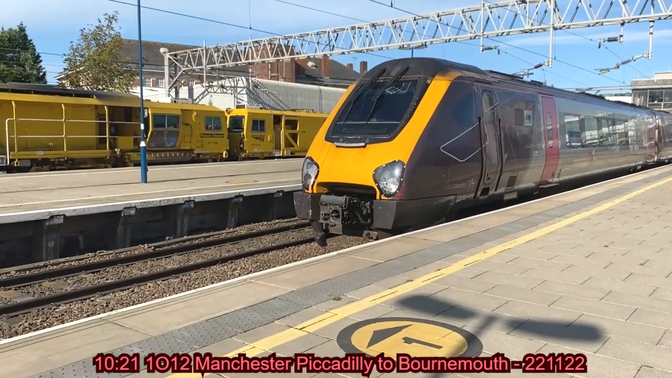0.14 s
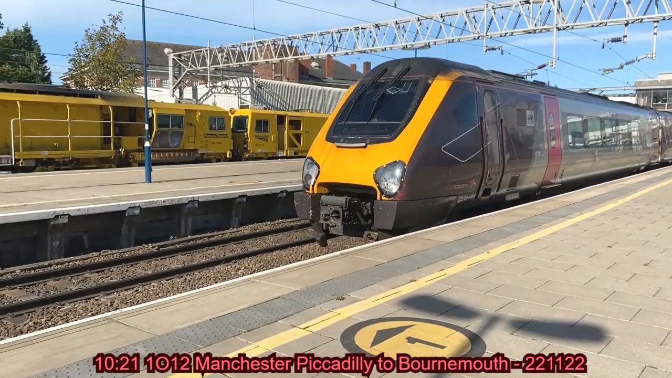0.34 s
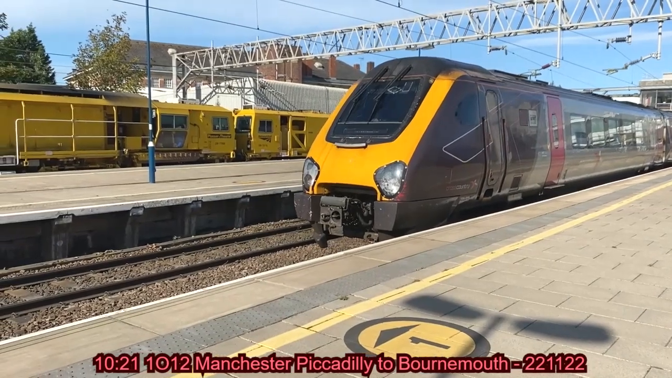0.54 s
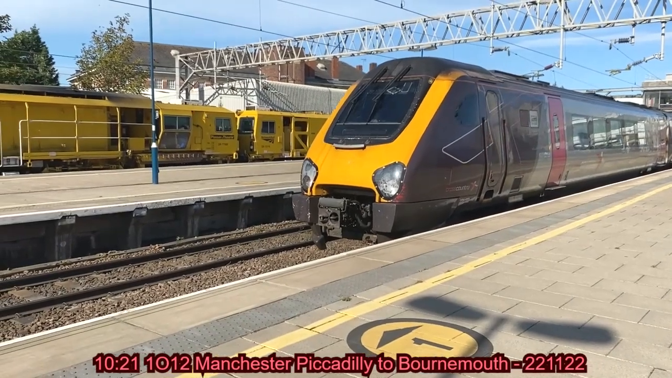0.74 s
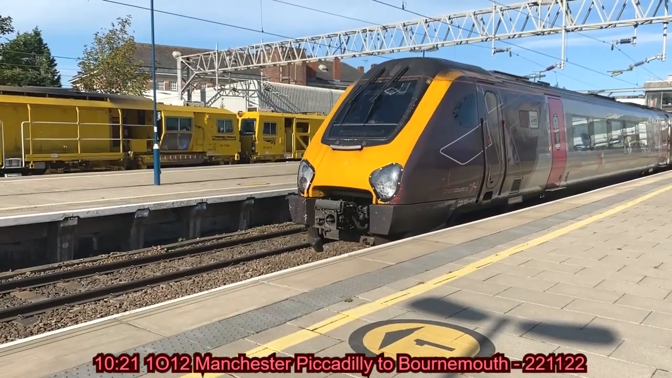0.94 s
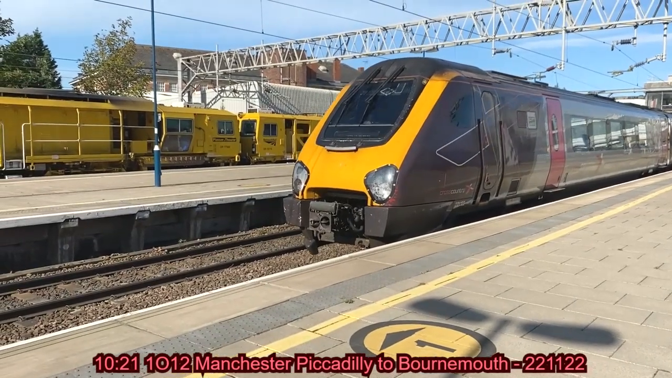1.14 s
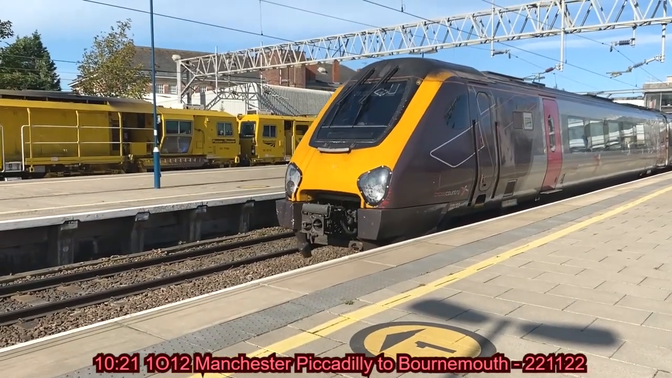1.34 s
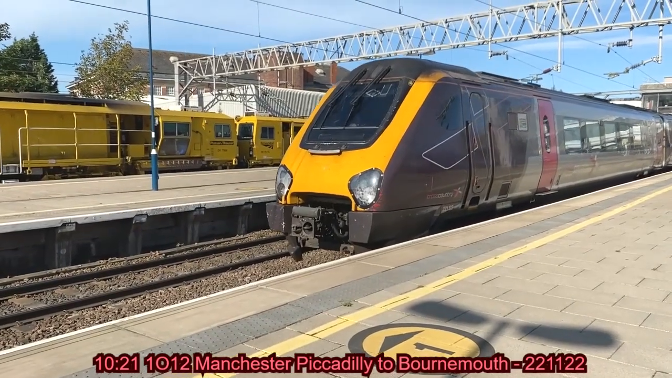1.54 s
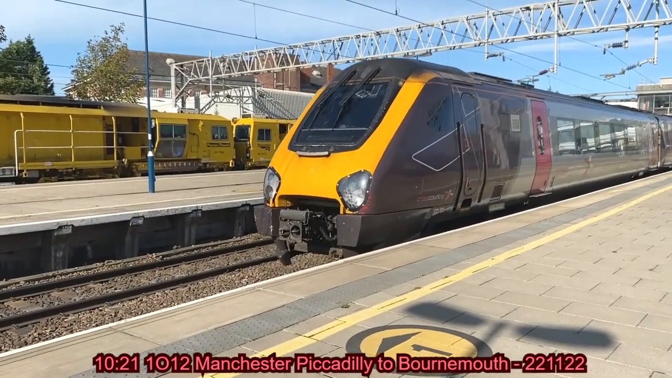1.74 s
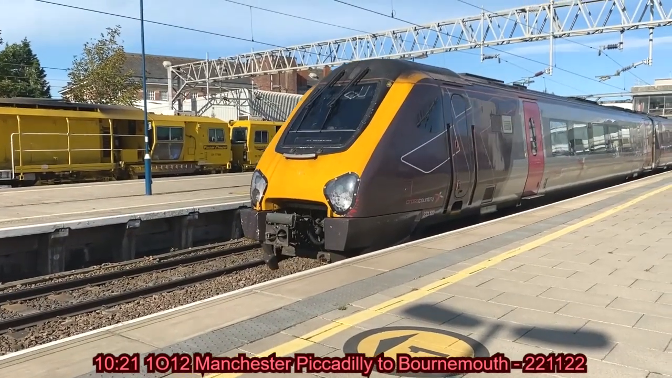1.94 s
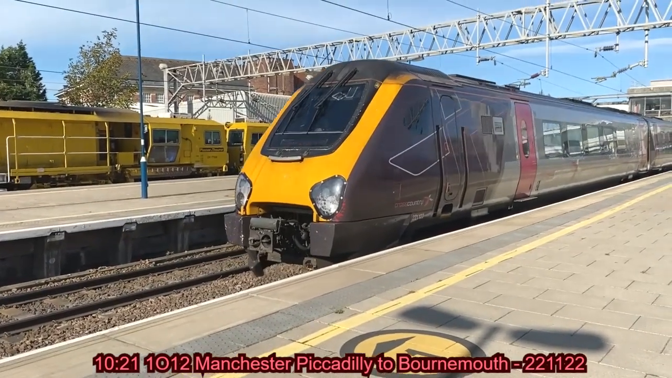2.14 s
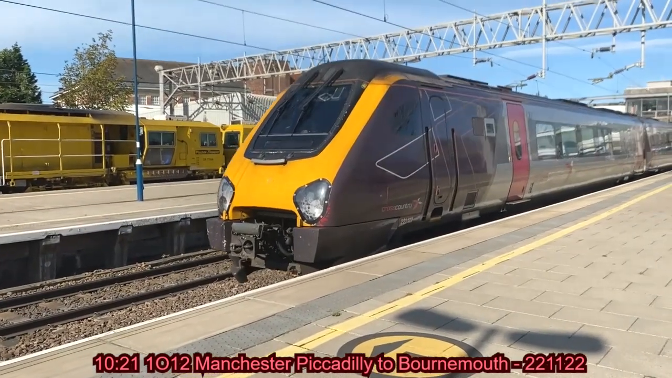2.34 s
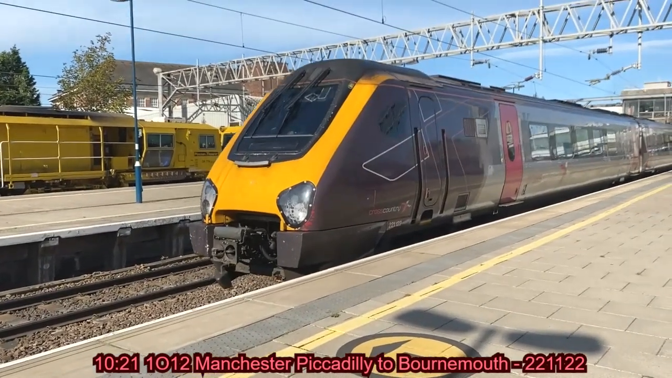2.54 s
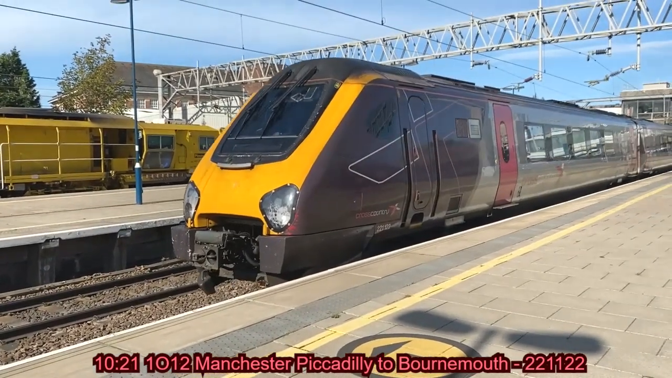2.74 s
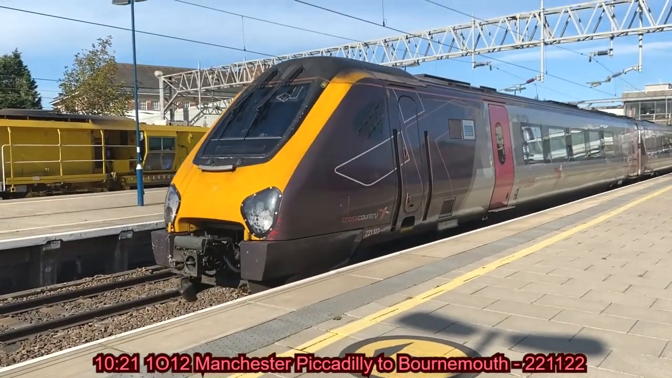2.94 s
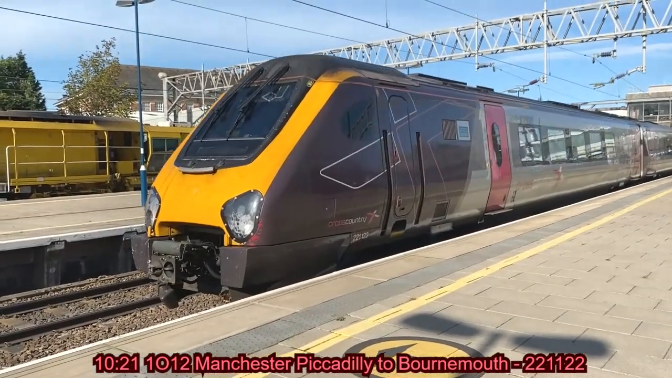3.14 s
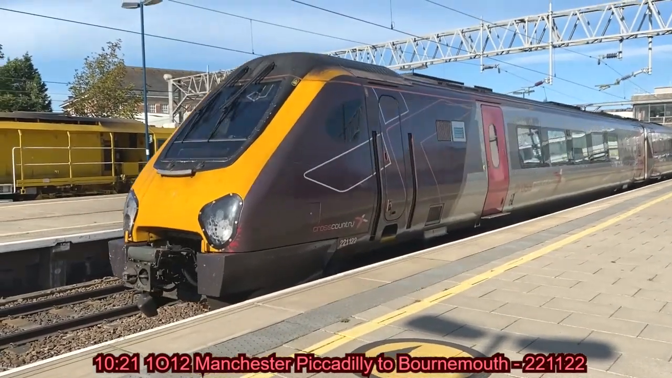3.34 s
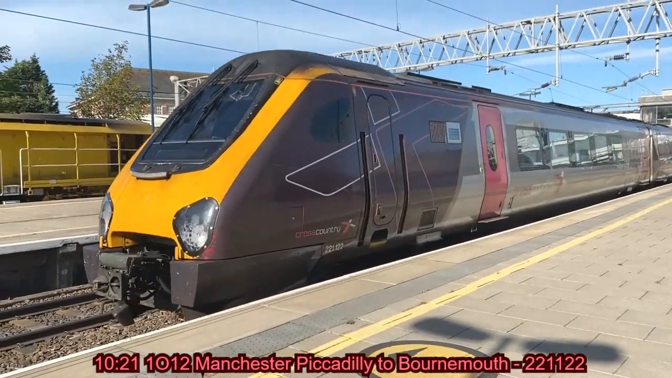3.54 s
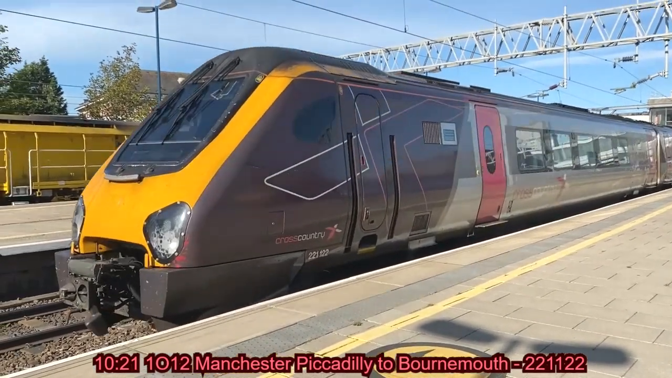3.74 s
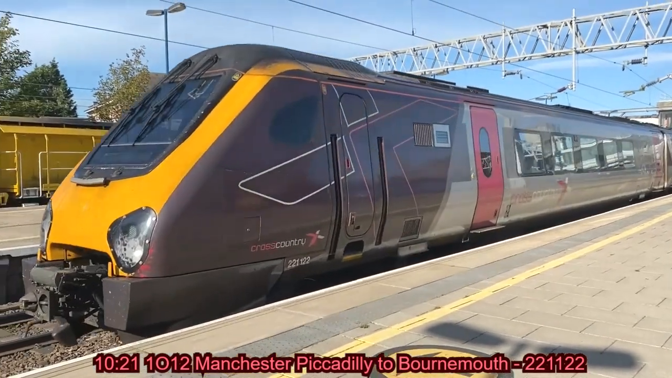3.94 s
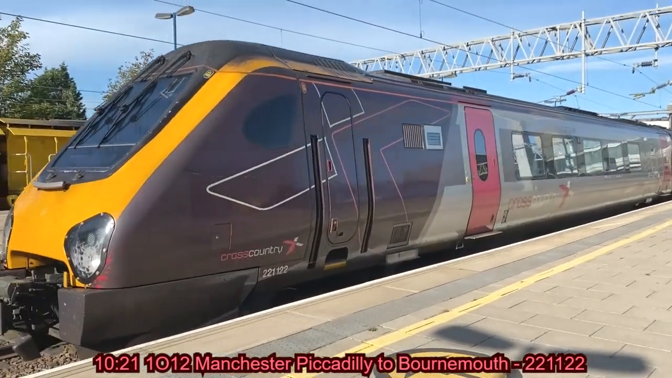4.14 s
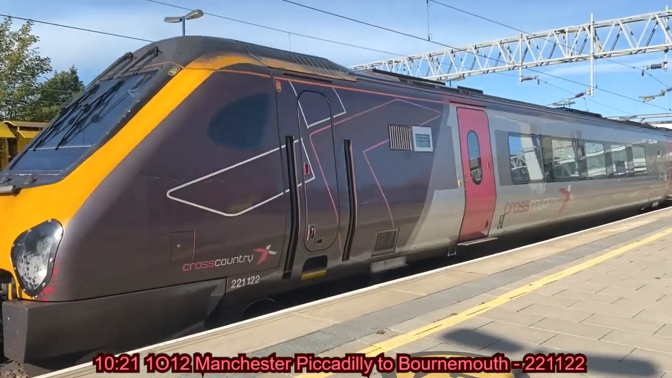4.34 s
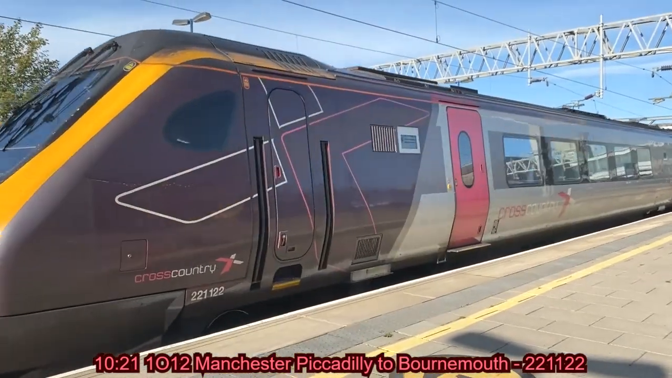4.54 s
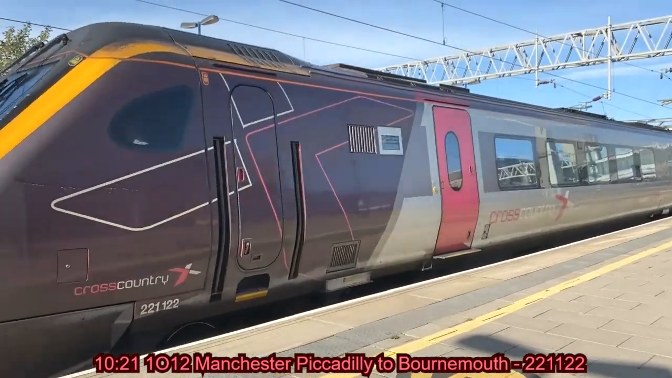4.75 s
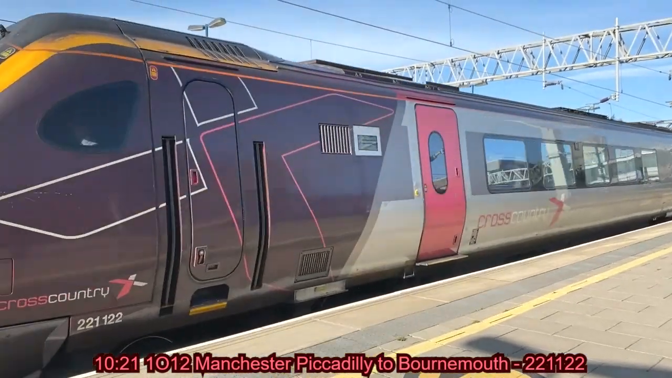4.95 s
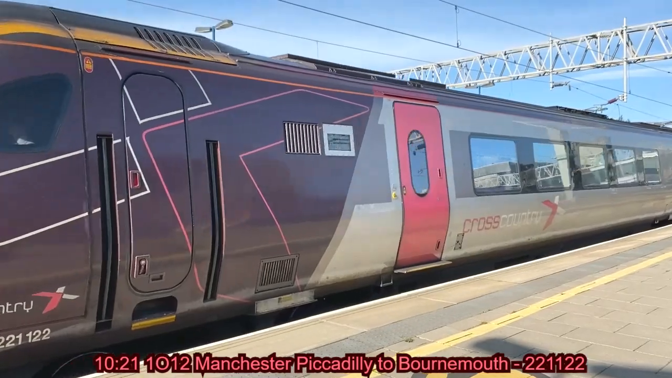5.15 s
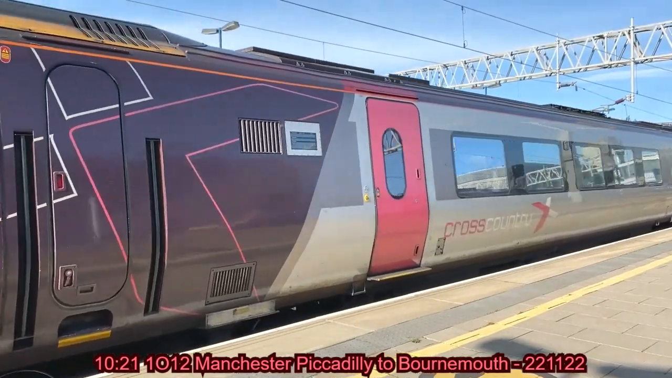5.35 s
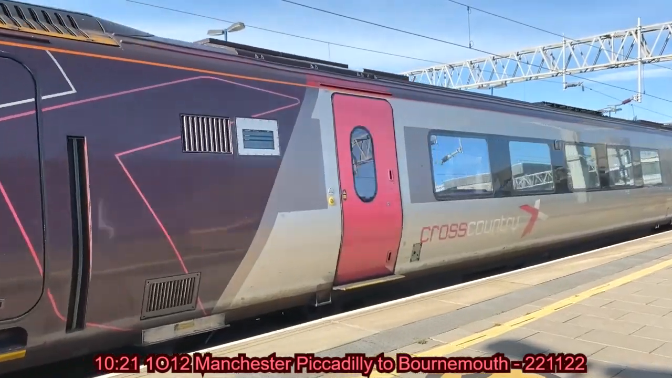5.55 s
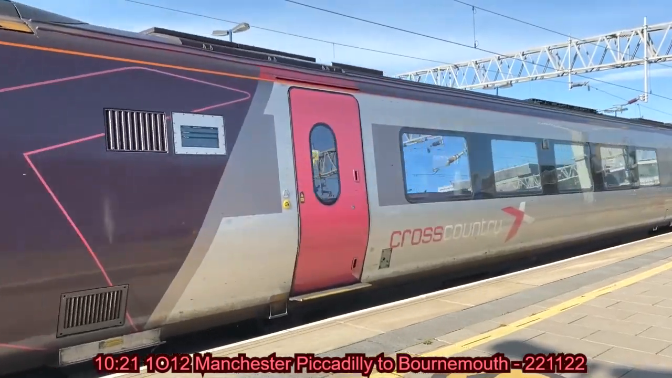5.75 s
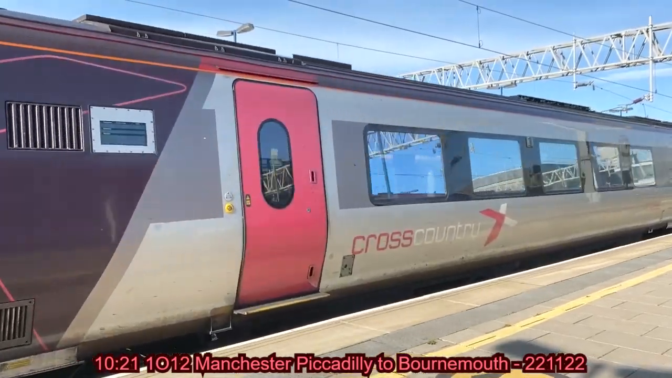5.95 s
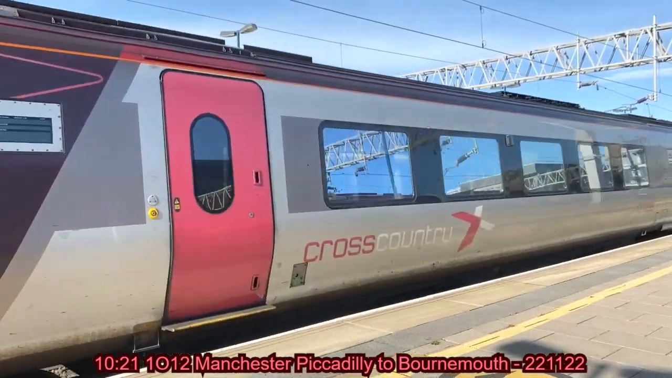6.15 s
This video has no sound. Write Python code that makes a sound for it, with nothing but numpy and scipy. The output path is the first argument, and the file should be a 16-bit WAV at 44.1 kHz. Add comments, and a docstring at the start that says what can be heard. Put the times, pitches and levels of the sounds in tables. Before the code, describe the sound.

Continuous heavy diesel rumble, loud from the start, with a faint station hum beneath. The engines rev upward, pulsing and fluttering, while a resonant rush of noise surrounds them. Around four seconds the nearest engine draws level and the sound opens out, brighter and fuller. In the last second a reedy whine and high whistle emerge. Stereo microphone standing on the platform, outdoors.

```python
"""A station platform: a diesel train pulls out along it toward two microphone ports, its six-cylinder engines revving up.
Additive synthesis gives the firing tones, the weaker tones on the engine cycle, a slower engine that beats with
the first, and the station hum. Random short-time spectra give the roar that rings under the carriages; as the first
engine draws level it hands over to an open roar with an electrical whine and a rising turbocharger."""
import sys
import numpy as np
from scipy import signal
from scipy.io import wavfile
from scipy.ndimage import uniform_filter1d, minimum_filter1d

SR = 44100
rng = np.random.default_rng(int(sys.argv[2]) if len(sys.argv) > 2 else 0)


def store_pcm(level_fs):
    """Save levels as 16-bit WAV."""
    pcm = np.round(np.clip(level_fs, -1, 1) * 32767).astype(np.int16)
    wavfile.write(sys.argv[1], SR, np.atleast_2d(pcm).T)


N = 277830


def gain_of(db):
    """Decibel law: 20 dB is a tenfold amplitude."""
    return 10 ** (np.asarray(db) / 20)


def evened(x):
    """Normalization: scales to unit mean square."""
    return x / np.sqrt(np.mean(x ** 2) + 1e-20)


def over_time(rows, t):
    """Linear interpolation of every column of a table at the times t."""
    s, *columns = np.transpose(rows)
    return [np.interp(t, s, c) for c in columns]


def over_pitch(rows, hz):
    """Interpolation on a logarithmic frequency scale of every column of a table."""
    f, *columns = np.transpose(rows)
    return [np.interp(np.log(hz + 1), np.log(f + 1), c) for c in columns]


def drift(t, top_hz):
    """Superposition of slow sines of random phase: an irregular fluctuation of unit power."""
    rates = np.geomspace(top_hz / 20, top_hz, 16)[:, None]
    sines = np.sin(2 * np.pi * (rates * t + rng.random(rates.shape)))
    return evened((sines / np.sqrt(rates)).sum(0))


def rings(modes, hz):
    """Resonance: power per Hz of noise peaked at each mode (f, width at quarter power, relative level)."""
    return sum(gain_of(2 * db) / w / (1 + (2 * (hz - f) / w) ** 2) ** 2 for f, w, db in modes)


def approach(t, start_db, slope_db, s, later_db):
    """Growth of level with approach: one slope in dB/s up to the time s, another after it."""
    return start_db + slope_db * np.minimum(t, s) + later_db * np.maximum(t - s, 0)


# Firing rate of the first engine: t/s, f/Hz
FIRING_RATE = [(0, 57.45), (.5, 57.08), (1.0, 59.19), (2.25, 67.28), (2.7, 69.32), (3.15, 71.4),
               (4.05, 74.7), (4.95, 78.9), (5.4, 82.18), (6.3, 84)]
# The three lowest firing tones, which swell and dip: t/s, 1st level/dB, 2nd level/dB, 3rd level/dB
FIRING_TONES = [(0, -27, -22.5, -36), (.38, -38.5, -26, -30.5), (.6, -23.5, -21.5, -24.5),
                (1.1, -21.5, -20.5, -26.5), (1.35, -28, -24, -21), (1.5, -19, -19.5, -28),
                (1.7, -16.5, -15.5, -23), (1.88, -20.5, -16, -19), (2.02, -34, -15.5, -15),
                (2.22, -16, -16.5, -18.5), (2.5, -18.5, -17, -22), (2.85, -16.5, -13.5, -28),
                (3.06, -14.5, -25.5, -25), (3.25, -18.5, -13, -25.5), (3.5, -22, -11, -26.5),
                (3.64, -36, -11.5, -28), (3.78, -16.5, -12, -21), (4.06, -14, -13.5, -33),
                (4.22, -38, -10.5, -29), (4.36, -13, -14, -35), (4.7, -17, -17, -20.5),
                (4.85, -13, -14, -20.5), (5.08, -19.5, -10.5, -37), (5.28, -16, -12, -21),
                (5.5, -34, -15, -22), (5.619, -21, -13.5, -23), (5.75, -19, -25, -17.5),
                (6.051, -16.5, -19, -24.5), (6.3, -21, -18.5, -20.5)]
# Unequal cylinders sound every multiple of the cycle: f/Hz, relative level/dB
UNEVEN_CYLINDERS = [(50, -34.5), (75, -53.5), (110, -41), (150, -39), (200, -24.5), (242, -34),
                    (290, -48.5), (340, -45), (420, -46.5), (650, -73.5)]
# Tones on the crank turn: t/s, then level/dB of the 10th, 14th, 16th, 20th, 22nd and 24th cycle multiple
CRANK_TONES = [(0, -48, -36, -36, -32, -44, -37), (.6, -44, -30, -33, -36, -52, -24.5),
               (1.05, -41, -33, -30.5, -30, -38, -26.5), (1.9, -49, -46, -42, -39, -36.5, -40),
               (2.5, -38, -42, -27, -29.5, -30.5, -36), (2.9, -33, -47, -24.5, -42, -35.5, -30),
               (3.15, -29.5, -47.5, -21.5, -22, -43, -36), (3.5, -31, -33.5, -33, -26.5, -36, -38.5),
               (4.3, -34.5, -41, -22.5, -26.5, -47, -44), (4.75, -28, -39, -25.5, -30, -41, -49),
               (5.0, -30, -45, -31, -27, -40, -40), (5.4, -25.5, -24, -26, -42, -41, -35.5),
               (6.3, -25, -23, -28.5, -41, -36, -32.5)]
# One odd cycle multiple that stands out as the engine nears: t/s, level/dB
FIFTEENTH_TONE = [(3.9, -43), (5.1, -32), (6.3, -31.5)]
# The two ports, for these tones and the near roar: f/Hz, coherence (0-1), left lead/rad, left-right level/dB
PORT_PAIR = [(60, .99, -.08, -.2), (250, .87, -.24, -1.4), (450, .68, .1, -.6), (750, .45, -1.9, 3.2),
             (1100, .65, .1, 1.8), (1700, .45, -.3, 1), (2500, .55, -.6, 0), (4200, .4, -.3, 1),
             (5500, .12, 0, .6), (6900, .88, 0, .1)]
UNEVEN_APPROACH = (-13, 3., 5.5, -0.5)  # dB, dB/s, s, dB/s
HALF_TURN_DB = -11  # multiples off the crank turn are weaker
WAVER_DB, CRANK_WAVER_DB = 3, 1.2  # rms
TURN_OVER_S = (3.0, 3.12)  # the even firing tones slip half a turn, so the thuds push the other way


def exhaust():
    """Fourier series of a periodic source: sines on multiples of the engine cycle, every sixth a firing tone."""
    t = np.arange(N) / SR
    coarse = t[::256]
    cycle_hz = over_time(FIRING_RATE, coarse)[0] / 6  # six firings a cycle
    cycles = np.cumsum(np.interp(t, coarse, cycle_hz)) / SR
    # firing tones are interpolated in amplitude, the others in dB
    firing = over_time([(s, *gain_of(db)) for s, *db in FIRING_TONES], coarse)
    firing_db = dict(zip((6, 12, 18), 20 * np.log10(firing)))
    crank_db = dict(zip((10, 14, 16, 20, 22, 24), over_time(CRANK_TONES, coarse)))
    crank_db[15] = over_time(FIFTEENTH_TONE, coarse)[0]
    uneven_db = approach(coarse, *UNEVEN_APPROACH)
    out = np.zeros((2, N))
    for k in range(5, 49):
        waver = drift(coarse, top_hz=5)
        if k in firing_db:
            db = firing_db[k]
        elif k in crank_db:
            db = crank_db[k] + CRANK_WAVER_DB * waver
        else:
            db = over_pitch(UNEVEN_CYLINDERS, k * cycle_hz)[0] + uneven_db + WAVER_DB * waver
            db += HALF_TURN_DB * (k % 2)
        # firing tones start nearly in step and add up to even thuds, the rest start anywhere
        start = rng.random() * (1 if k % 6 else .1)
        start = start + (k % 12 == 0) * np.interp(t, TURN_OVER_S, (0, .5))
        # with several engines each tone wanders a little
        wander = np.interp(t, coarse, .22 * drift(coarse, top_hz=3))
        phase = 2 * np.pi * (k * cycles + start) + wander
        _, lead, balance_db = over_pitch(PORT_PAIR, k * cycle_hz.mean())
        # echoes shift each tone from side to side
        lead = lead + np.interp(t, coarse, (.05 + k / 200) * drift(coarse, top_hz=2))
        peak = np.sqrt(2) * np.interp(t, coarse, gain_of(db))
        out[0] += gain_of(balance_db / 2) * peak * np.cos(phase + lead)
        out[1] += gain_of(-balance_db / 2) * peak * np.cos(phase)
    return out


# The engine that lags behind: t/s, share of the first engine's speed, level/dB before each tone's offset
SLOWER_ENGINE = [(1.2, 0.93, -53), (2.0, 0.94, -40), (3.0, 0.98, -31), (4.0, 0.95, -30), (5.0, 0.97, -22),
                 (5.7, 0.98, -29), (6.3, 0.93, -36)]


def slower_engine():
    """Beats by superposition: three firing tones slightly below those of the first engine."""
    t = np.arange(N) / SR
    share, db = over_time(SLOWER_ENGINE, t)
    firings = np.cumsum(over_time(FIRING_RATE, t)[0] * share) / SR
    wavers = [np.interp(t, t[::256], drift(t[::256], top_hz=5)) for _ in range(3)]
    out = np.zeros(N)
    for multiple, tone_db, waver in zip((1, 2, 3), (-5, -1, -7), wavers):
        peak = np.sqrt(2) * gain_of(db + tone_db + WAVER_DB * waver)
        out += peak * np.cos(2 * np.pi * (multiple * firings + rng.random()))
    return out


# Roar of the engines down the train: f/Hz, relative level/dB per Hz
DISTANT_SPECTRUM = [(32, -81.5), (50, -42.5), (88, -51.5), (230, -64), (420, -56.5), (620, -73),
                    (1000, -62), (1400, -72), (2100, -74), (3500, -80), (6000, -90.5), (9000, -100),
                    (14500, -106)]
# Space under the carriages: f/Hz, width/Hz, relative level/dB, gain/(dB/s), climb/Hz as the cab passes
CARRIAGE_RINGS = [(825, 160, 6.5, -0.58, 169.5), (1714, 190, -3.5, 0.66, 160), (2558, 230, -9, 0.9, 60),
                  (2668, 50, -11.5, 1.1, 45), (3038, 100, -9, -0.3, 0)]
# Roar of the nearest engine and its fans: f/Hz, relative level/dB per Hz
NEAR_SPECTRUM = [(32, -89), (48, -48), (95, -43.5), (200, -39.5), (350, -50.5), (550, -58.5), (750, -66.5),
                 (1300, -67), (2000, -73), (3000, -77.5), (4500, -84), (7000, -88.5), (10000, -93.5),
                 (14500, -96)]
# Resonances of the near roar: f/Hz, width/Hz, relative level/dB
NEAR_RESONANCES = [(1122, 270, 2.5), (2320, 170, -13)]
# Growth of the near roar: t/s, level/dB
NEAR_GROWTH = [(0, -8), (3, -5), (4.5, 0), (5.2, 0.6), (6.3, 4)]
# Bass bends round the cab, so it gains less: f/Hz, share of the growth in dB
DIFFRACTION = [(150, 0.2), (280, .45), (450, 0.96), (8000, 1.07)]
# Engine bay, a hollow ring and an electrical whine: f/Hz, width/Hz, relative level/dB, delay/s
BAY_RINGS = [(1590, 280, 7, 0), (2710, 55, 3.5, .2), (5420, 70, -12, 0)]
# Turbocharger whine: t/s, f/Hz, relative level/dB
TURBOCHARGER = [(4.8, 5150, -85), (5.3, 5400, -66), (5.6, 5540, -58), (6, 5700, -58), (6.3, 5780, -57)]
DISTANT_APPROACH, DISTANT_LEAST_DB = (0.1, 0.26, 3.5, -7), -7  # dB, dB/s, s, dB/s
BAY_APPROACH = (-133, 15.5, 5.5, 5.5)  # dB, dB/s, s, dB/s
RING_WAVER_DB, RING_WANDER = .7, .007  # each ring swells and shifts by this share of its pitch, rms
RING_RISE_S = (3.4, 4.3)  # the rings climb as the cab passes


def roar_power(t, f):
    """Incoherent addition: powers of distant roar, near roar, engine bay and turbocharger sum."""
    distant_db = np.maximum(approach(t, *DISTANT_APPROACH), DISTANT_LEAST_DB)
    near_db = over_time(NEAR_GROWTH, t)[0]
    near_db = near_db[0] + over_pitch(DIFFRACTION, f)[0] * (near_db - near_db[0])
    risen = np.interp(t, RING_RISE_S, (0, 1))
    hollow = []
    for ring_hz, width, db, slope_db, climb_hz in CARRIAGE_RINGS:
        moving_hz = risen * climb_hz + ring_hz * (1 + RING_WANDER * drift(t, top_hz=8))
        grown_db = db + slope_db * np.minimum(t, RING_RISE_S[0])
        hollow.append((moving_hz, width, grown_db + RING_WAVER_DB * drift(t, top_hz=16)))
    distant = gain_of(2 * over_pitch(DISTANT_SPECTRUM, f)[0]) + gain_of(2 * -40) * rings(hollow, f)
    near = gain_of(2 * over_pitch(NEAR_SPECTRUM, f)[0]) + gain_of(2 * -41) * rings(NEAR_RESONANCES, f)
    bay = [(ring_hz, width, db + approach(t - late_s, *BAY_APPROACH) + drift(t, top_hz=4.5))
           for ring_hz, width, db, late_s in BAY_RINGS]
    turbo_hz, turbo_db = over_time(TURBOCHARGER, t)
    turbo = [(turbo_hz, 70, turbo_db + 2 * drift(t, top_hz=8))]
    power = gain_of(2 * distant_db) * distant + gain_of(2 * near_db) * near
    return power + rings(bay, f) + rings(turbo, f)


# The ports while the roar comes along the carriages with an echo off them: f/Hz, coherence (0-1), left lead/rad
FAR_PORT_PAIR = [(60, .99, -.08), (480, .78, -.2), (620, .45, -3), (900, .72, -.3), (1080, .5, 1.3),
                 (1380, .25, 2), (1500, .45, 4.6), (1850, .55, 6.4), (2100, .45, 4.7), (2480, .77, 6.9),
                 (2850, .3, 8.5), (3500, .4, 6.2), (4300, .52, 6.8), (5500, .1, 6.5), (6900, .67, 6.5)]
SIZE, HOP = 2048, 512  # samples
HAND_OVER_S = (3.8, 4.3)  # from the far to the near port relations
TREBLE_HZ, TURN_HZ = 6900, 4200  # above TREBLE_HZ a delay between the ports adds a turn of lag every TURN_HZ


def roar():
    """Partial coherence: noise from random short-time spectra, linked between the ports by frequency."""
    frames, hz = N // HOP + 5, np.fft.rfftfreq(SIZE, 1 / SR)
    t, f = np.arange(frames) * HOP / SR, hz[:, None]
    power = roar_power(t, f)
    a, b, c, d, patches, streaks = rng.standard_normal((frames, len(hz), 6)).T
    # random narrow streaks, each lasting about half a second, colour the roar
    streaks = evened(uniform_filter1d(uniform_filter1d(streaks, size=3, axis=0), size=40, axis=1))
    # random patches are broader and briefer
    patches = evened(uniform_filter1d(uniform_filter1d(patches, size=14, axis=0), size=6, axis=1))
    same, lead, balance_db = over_pitch(PORT_PAIR, f)
    same_far, lead_far = over_pitch(FAR_PORT_PAIR, f)
    near = np.interp(t, HAND_OVER_S, (0, 1))
    link = near * same * np.exp(1j * lead) + (1 - near) * same_far * np.exp(1j * lead_far)
    link = link * np.exp(-2j * np.pi * np.maximum(f - TREBLE_HZ, 0) / TURN_HZ)
    right = a + 1j * b
    left = link * right + np.sqrt(1 - np.minimum(abs(link), 1) ** 2) * (c + 1j * d)
    z = np.array([left * gain_of(balance_db / 2), right * gain_of(-balance_db / 2)])
    colour_db = 1.4 * streaks + .6 * patches + .4 * drift(t, top_hz=9)
    z *= np.sqrt(power * SR / SIZE * 1.5) * gain_of(colour_db)
    return signal.istft(z, nperseg=SIZE, noverlap=SIZE - HOP)[1][:, :N]


# Station hum, screened as the train moves: f/Hz, level/dB, start of fade t/s, loss/(dB/s)
STATION_HUM = [(50, -31.5, 4.7, 12.), (100, -33, 1.4, 9.)]


def hum():
    """Pure tones behind a moving screen: sines that waver in level and phase and lose up to 12 dB."""
    t, out = np.arange(N) / SR, np.zeros(N)
    for hz, db, s, loss_db in STATION_HUM:
        waver = np.interp(t, t[::256], drift(t[::256], top_hz=2))
        level_db = db - np.clip(loss_db * (t - s), 0, 12.) + 2 * waver
        out += np.sqrt(2) * gain_of(level_db) * np.cos(2 * np.pi * (hz * t + rng.random()) + waver)
    return out


def scene():
    """Linear superposition of tones, roar and hum at the two ports."""
    return exhaust() + slower_engine() + hum() + roar()


CEILING_DB, EDGE_HZ = -.7, 15700  # limiter ceiling re full scale, upper band edge


def record(dry):
    """Peak limiting, then low-pass filtering: gain eases down around the tallest pulses of either port."""
    room = np.minimum(gain_of(CEILING_DB) / (abs(dry).max(0) + 1e-9), 1)
    room = minimum_filter1d(room, size=801)
    limited = dry * uniform_filter1d(uniform_filter1d(room, size=400), size=400)
    limited = limited * signal.windows.tukey(N, .002)  # soft ends
    low_pass = signal.firwin(511, EDGE_HZ, window=("kaiser", 9), fs=SR)
    return signal.oaconvolve(limited, low_pass[None], "same", axes=1)


dry = scene()
out = record(dry)
store_pcm(out)
```